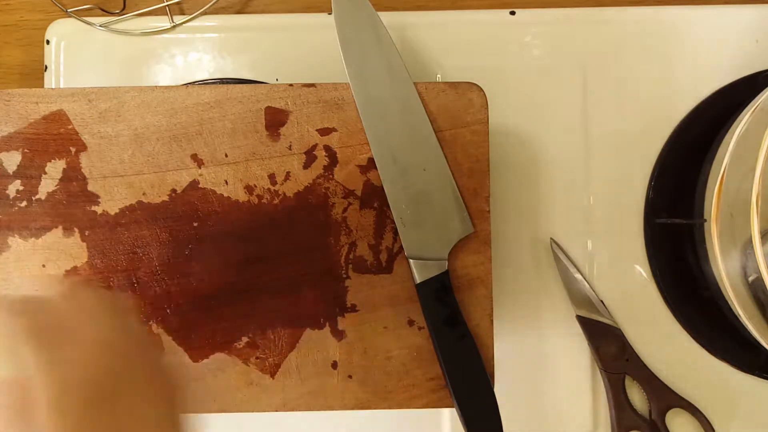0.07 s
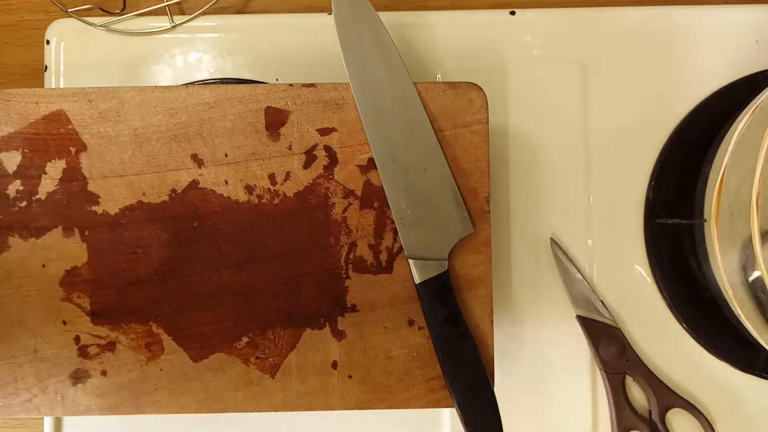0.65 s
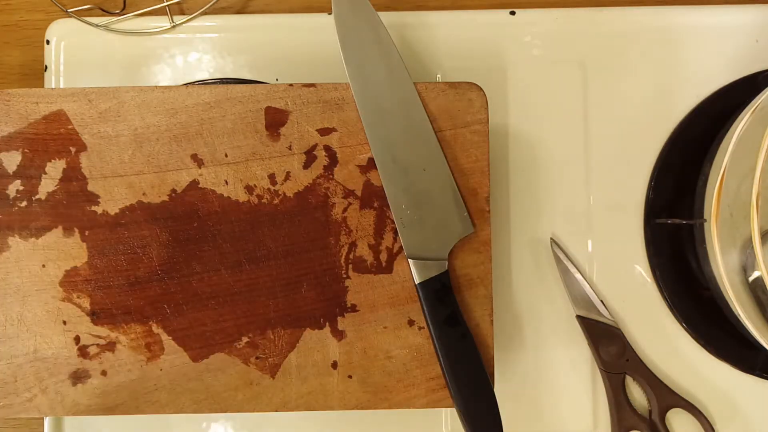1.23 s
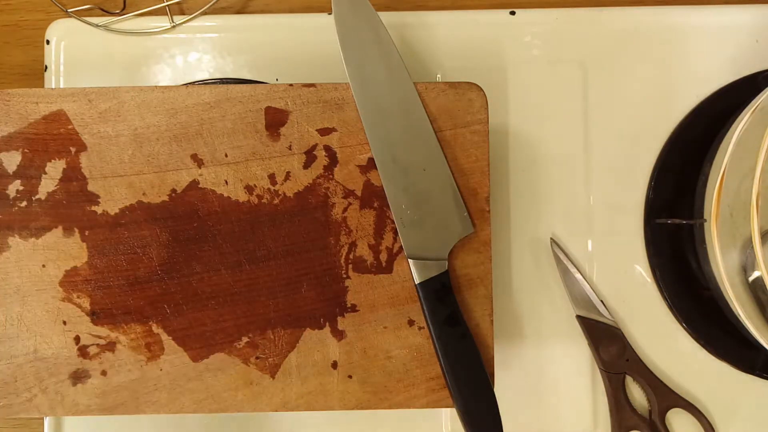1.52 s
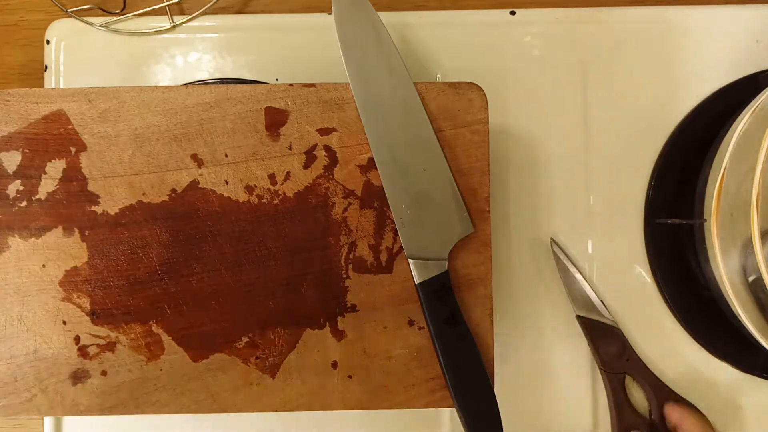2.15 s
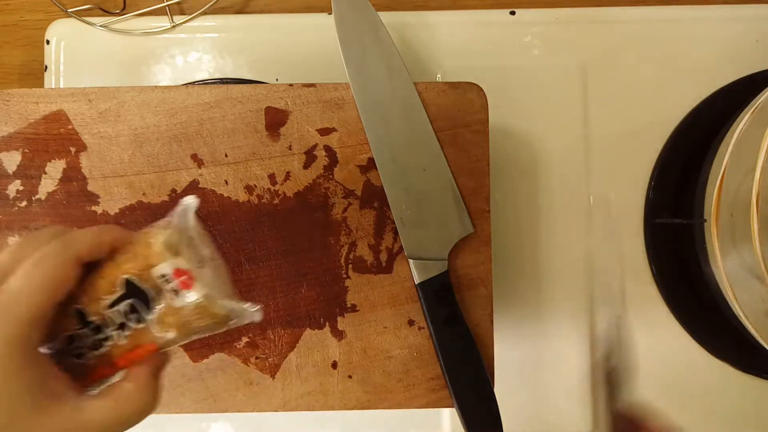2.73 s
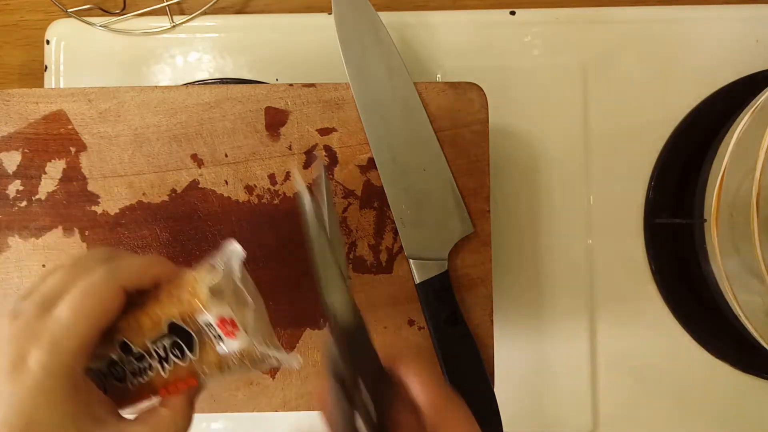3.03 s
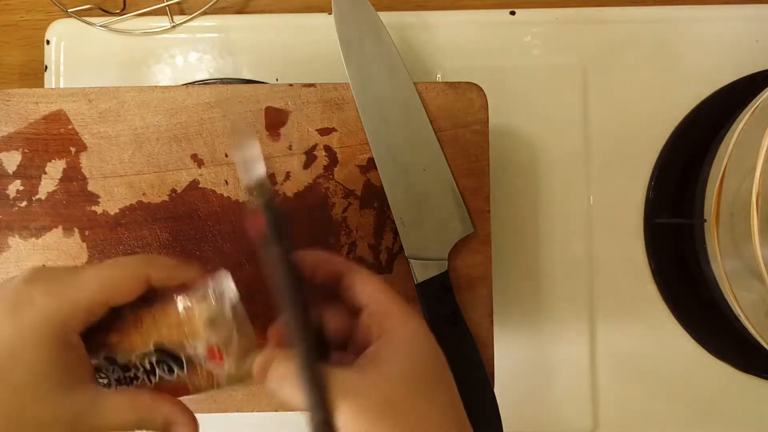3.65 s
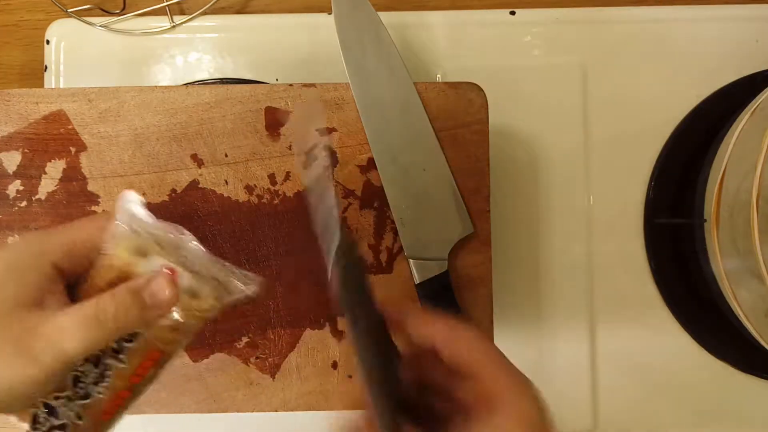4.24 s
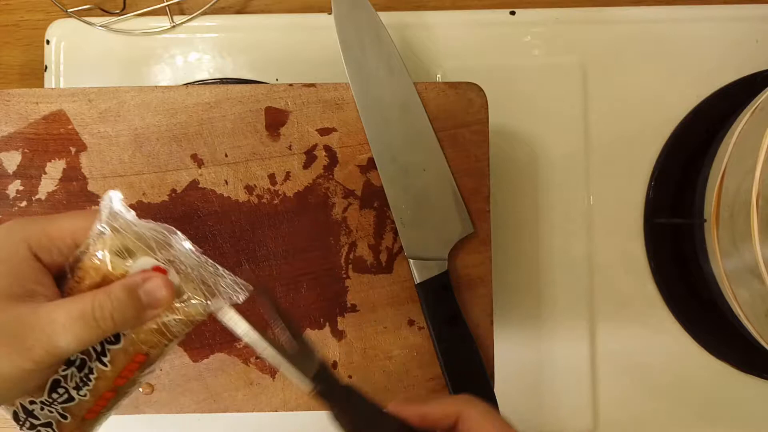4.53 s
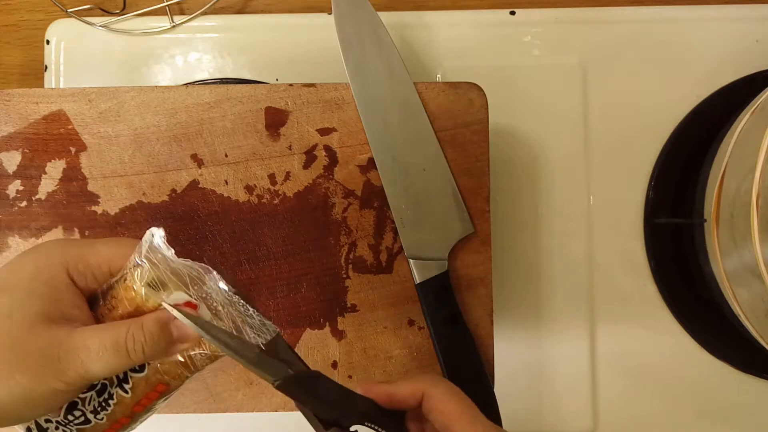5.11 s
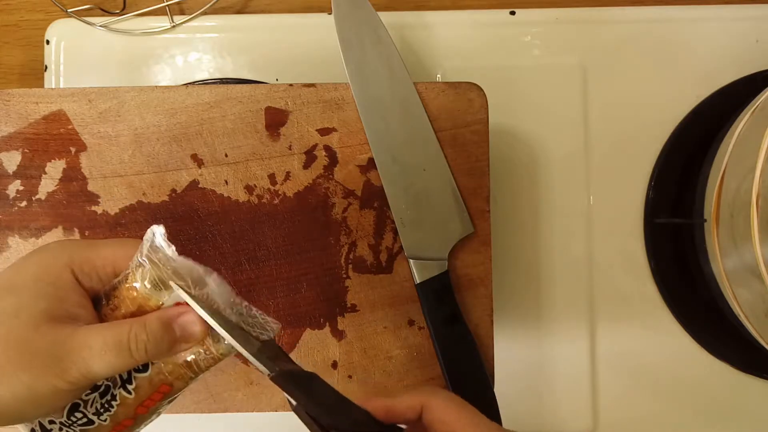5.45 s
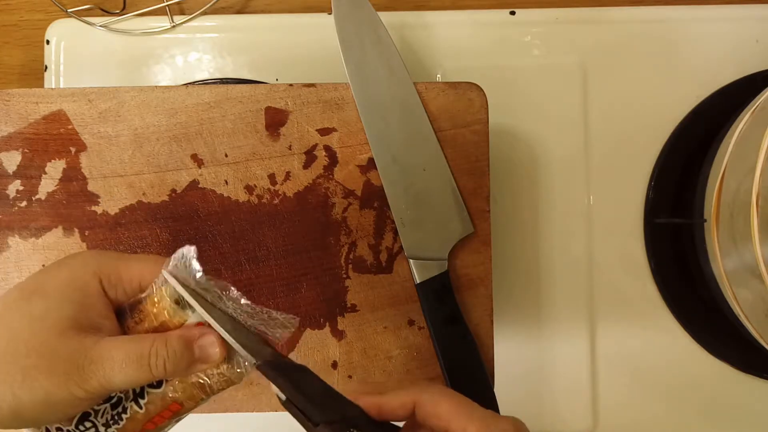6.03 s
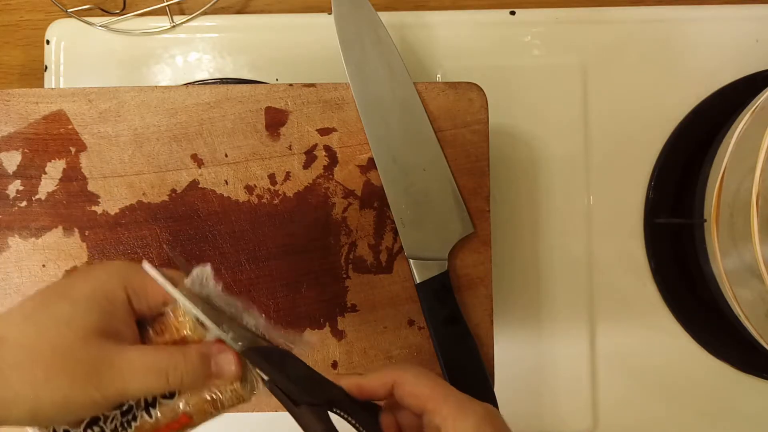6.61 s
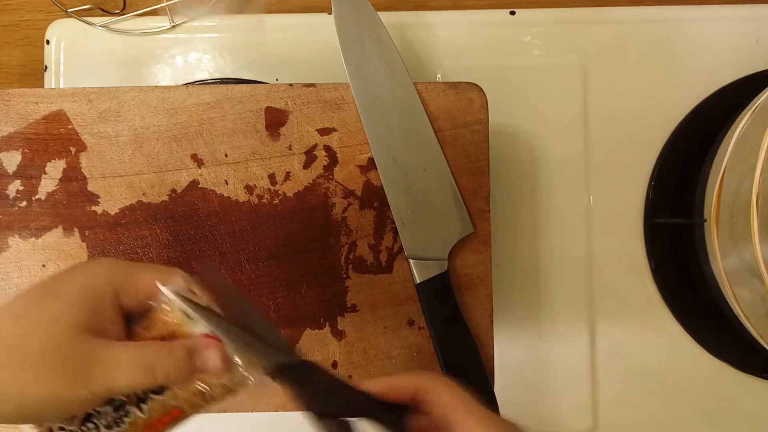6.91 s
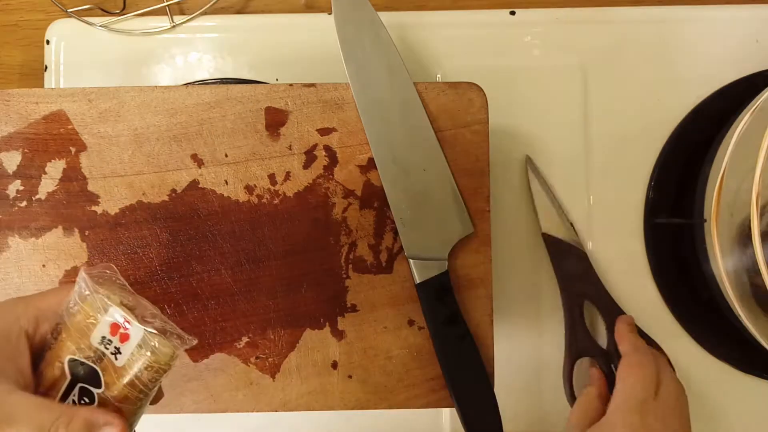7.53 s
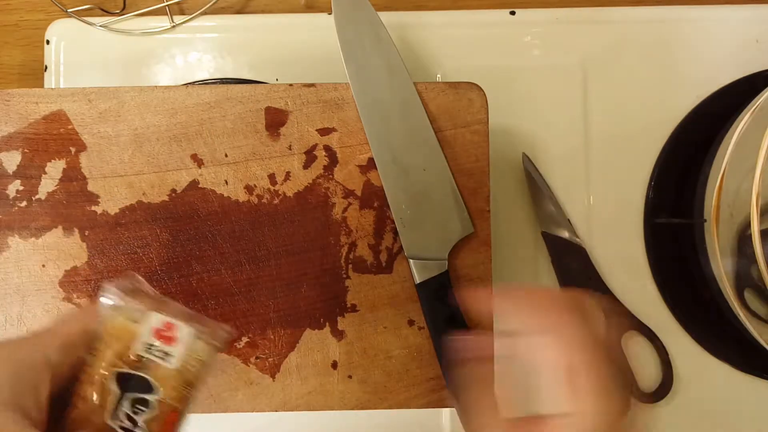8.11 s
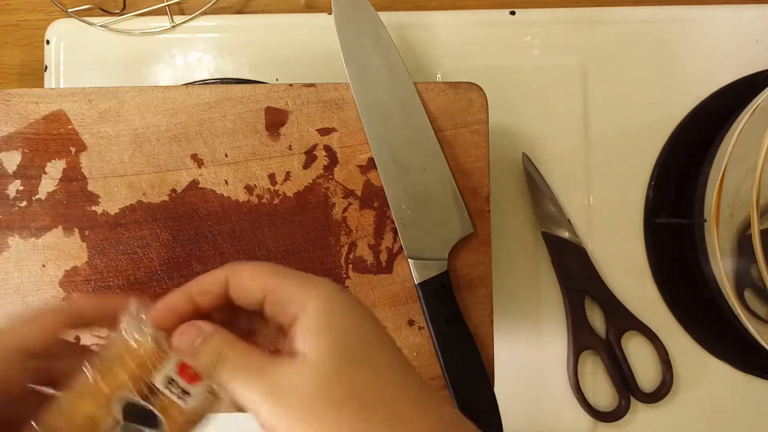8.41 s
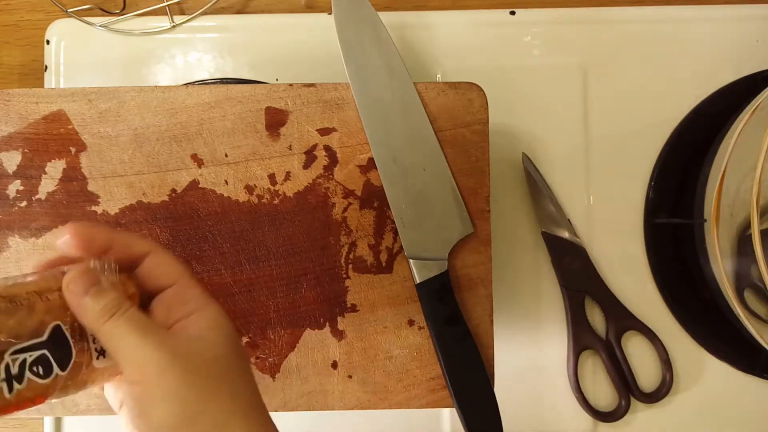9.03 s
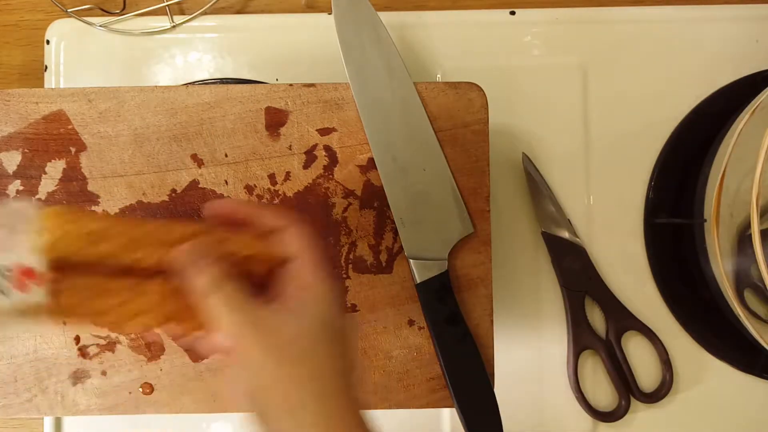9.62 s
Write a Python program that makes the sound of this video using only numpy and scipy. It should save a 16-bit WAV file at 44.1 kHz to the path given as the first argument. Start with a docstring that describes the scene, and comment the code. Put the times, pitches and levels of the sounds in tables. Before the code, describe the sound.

In a small kitchen with a faint low hum, stiff plastic packaging is handled close to the microphones. Light swishes and ticks come first, followed by the metallic knock of scissors being picked up. Crisp crinkling builds, with short cuts through the film and one hard crack. The blades snap shut and the scissors clatter onto a stove top. Then the wrapper is pulled open with thick crackling and a dull crunch from its filling.

```python
"""A stiff plastic snack wrapper rustles and crackles, close to a pair of microphones in a small kitchen.
Its creases snap through and its film hisses as it is handled, cut open over a wooden board and peeled
back; the filling crunches dully. Scissors clatter on the hollow stove top when picked up and laid down,
their handles clack and their blades click shut and ring. Behind it all the hard room hums faintly.
At about 3.5 s the sound drops out for an instant."""
import sys
import numpy as np
from scipy import signal
from scipy.fft import rfft, irfft, next_fast_len
from scipy.io import wavfile

SR = 44100
rng = np.random.default_rng(int(sys.argv[2]) if len(sys.argv) > 2 else 0)


def int16_out(signal):
    """Quantize to a 16-bit WAV file."""
    q = np.round(np.clip(np.atleast_2d(signal).T, -1, 1) * 32767)
    wavfile.write(sys.argv[1], SR, q.astype(np.int16))


N = 430416

# spectrum of the crackling film: frequency_hz, level_db
FILM_SPECTRUM = [(200, -13.5), (400, -10.5), (1000, -10.5), (1800, -6.5), (2400, -3), (3400, -0.5),
                 (4600, -3.5), (6500, -4.5), (8000, -13), (11000, -11.5), (15500, -38.5)]
# spectrum of the bright edge of a snap or tear: frequency_hz, level_db
CRISP_SPECTRUM = [(2000, -13), (5000, -36.5), (6800, 3.5), (8200, -2), (12000, -6), (15500, -15)]
# spectrum of the dull crunch of the filled pack: frequency_hz, level_db
FILLING_SPECTRUM = [(150, -23.5), (400, 4), (700, 1), (1300, 5), (2200, -9.5), (4000, -33)]
# spectrum of clattering steel: frequency_hz, level_db
STEEL_SPECTRUM = [(700, -13.5), (1400, -4), (2300, -1.5), (3600, 0), (5000, -6.5), (6700, -2),
                  (8000, -10.5), (12000, -10), (16000, -20)]
# scissors against board and stove top: start_s, thud_db, thud_hz, clatter_db, clatter_hz, chatter_s
KNOCK_EVENTS = [(2.24, -50.5, 380, -62, 1440, 0.013), (2.377, -34.5, 513, -42, 3400, 0.038),
                (2.4947, -29, 370, -39, 4380, 0.053), (7.532, -33, 225, -39.5, 5060, 0.039),
                (7.718, -30, 580, -47, 1330, 0.0097), (7.867, -34.5, 295, -40.5, 4170, 0.011),
                (8.007, -31.5, 590, -35, 4400, 0.05), (8.131, -46, 500, -54, 2580, 0.0037)]
# blades clicking shut: start_s, level_db
SNIP_EVENTS = [(2.3033, -25), (7.2337, -19.5)]


def crease_snaps(facet_db=6.5, crack_db=6, crisp_db=1, slip_t60=0.013, avalanche_t60=0.046):
    """A crease flips in a stutter of slips, its facet rings brightly, and an avalanche of folds follows."""
    # the loudest creases: start_s, level_db, facet_hz, edge_db, avalanche_gain
    loud_creases = [(0.4578, -31.5, 3770, -18, 0.88), (1.495, -37.5, 3320.0, -6, 0.66),
                    (1.6417, -31, 3830, 2, 1.27), (1.9821, -38, 3770, -16, 0.89),
                    (2.1196, -37.5, 4300, -6, 1.1), (2.8456, -24.5, 3950.0, -2.5, 0.56),
                    (2.8912, -22.5, 3500, -17, 0.41), (3.265, -27, 3540.0, -3, 0.64),
                    (3.274, -20, 4040, -1.5, 0.31), (3.3407, -27.5, 3500, -9, 0.72),
                    (3.4126, -29, 3520, -1, 0.67), (3.5389, -26, 3760.0, -1.5, 0.27),
                    (3.5915, -23.5, 3380, -2, 1.3), (3.7227, -18.5, 3560, -2, 0.26),
                    (3.7584, -23.5, 3720.0, 0, 0.44), (3.7794, -23, 3320, -1, 1.7),
                    (3.8585, -17.5, 2460.0, -11.0, 0.49), (3.8645, -22, 3730, 0.5, 0.84),
                    (3.9, -20, 3400, -6, 0.5), (4.0762, -23, 3640.0, -5, 0.24),
                    (4.2156, -27.5, 3570, -3.5, 0.6), (4.2532, -26, 3200.0, -7.5, 0.8),
                    (4.363, -27, 3060, -1, 0.5), (4.8703, -28, 3140, 1, 0.3),
                    (4.9185, -21.5, 3850, -1, 0.43), (4.9314, -23.5, 3400.0, -2, 0.3),
                    (5.003, -23.5, 3630, -6, 0.32), (5.1163, -27, 4200, -15, 0.27),
                    (5.2932, -23, 4930.0, -3, 0.28), (5.3555, -22.5, 2860.0, -7.0, 0.48),
                    (5.3872, -25.5, 4340.0, -2, 0.51), (5.468, -25.5, 4330.0, 4, 0.36),
                    (5.5714, -17.5, 3470, -5, 0.24), (5.6365, -21.0, 2850, 2.5, 0.49),
                    (5.9108, -23.5, 3800.0, -3, 0.5), (5.9413, -18, 2900, -5.5, 0.24),
                    (6.0038, -21, 4000, -6, 0.26), (6.2354, -28.5, 4620.0, -1, 0.6),
                    (6.2652, -21.0, 3000, 0, 0.43), (6.2945, -23, 2770.0, -17, 0.34),
                    (6.7496, -25.5, 4070.0, 6, 0.37), (6.7982, -23.5, 4220, -2, 0.31),
                    (6.994, -25.5, 2670.0, -6, 0.48), (7.004, -25.5, 3290.0, 3.5, 0.26),
                    (7.0537, -24, 3240, -0.5, 0.6), (7.419, -33.5, 2610, -11, 0.4),
                    (8.32, -19.5, 2360, -6, 0.42), (8.356, -19, 2500, -3.5, 1.34),
                    (8.4094, -25, 3970.0, -1.0, 0.37), (8.5138, -20.5, 3100, -8.5, 0.66),
                    (8.7585, -26, 3040, -14, 0.6), (8.8927, -17, 4340, 1.5, 0.43),
                    (8.9654, -23.5, 3590.0, -8, 0.32), (8.975, -25.5, 3210.0, 3, 0.27),
                    (9.0857, -18.5, 4380, -3, 0.78), (9.1535, -20, 2980, 2.5, 0.56),
                    (9.1863, -18.5, 3040.0, -11, 0.4), (9.2024, -16.5, 3720, -3, 0.54),
                    (9.241, -15.5, 4340, -0.5, 0.2), (9.3878, -20, 3620, 1, 0.4),
                    (9.3934, -19, 3200, -9, 0.8), (9.4908, -21.5, 3730.0, -1.5, 0.26),
                    (9.5372, -23.5, 2520, -10, 0.2), (9.6002, -22, 3490.0, -5, 0.55)]
    body, edge, t = np.zeros(N), np.zeros(N), np.arange(SR // 8) / SR
    impulse = t == 0
    for start, db, hz, edge_db, avalanche in list(loud_creases) + lesser_creases():
        flip = impulse + 0.18 * rng.standard_normal(len(t)) * fade(t, slip_t60)
        folds = clicks(900, 2.5, len(t)) * fade(t, avalanche_t60)
        force = from_db(db) * (flip / np.linalg.norm(flip) + avalanche * folds / np.linalg.norm(folds))
        # the facet is heavily damped and radiates little below its own pitch
        facet = resonance(force, hz, width_hz=0.46 * hz)
        crack = signal.sosfilt(signal.butter(2, 0.13 * hz, "high", fs=SR, output="sos"), force + 1e-18)
        first_slip = 0.18 * from_db(db) * impulse
        add(body, start, from_db(facet_db) * facet + from_db(crack_db) * crack)
        add(edge, start, from_db(crisp_db + edge_db) * (force + first_slip))
    softened = colour(colour(body, FILM_SPECTRUM), [(6500, 0.5), (9000, -5.5)])
    return softened + colour(edge, CRISP_SPECTRUM)


def lesser_creases(per_s=22, lift_db=3.5, spread_db=4, facet_hz=3400, edge_db=-2, avalanche=0.5):
    """Rows for small snaps at random times, as strong as the handling, within an octave of facet_hz."""
    handling, _, _ = hands()
    rows = []
    for when, strength, pitch in rng.random((int(per_s * N / SR), 3)):
        at = int(when * (N - 1))
        db = 20 * np.log10(handling[at] + 1e-9) + lift_db - spread_db * np.log(max(strength, 0.1))
        rows.append((at / SR, db, facet_hz * 2 ** (2 * pitch - 1), edge_db, avalanche))
    return rows


def rustle(film_db=-3, crisp_db=-22, filling_db=-4, shear_db=-4, drag_db=-3):
    """Tiny folds in bunches, denser as the hands work harder, with hiss, crunch, shearing and swish."""
    handling, squeeze, drag = hands()
    busy = np.sqrt(handling / handling.mean()) + 0.22
    folds = rms_one(facets(260 * busy) * clumps(per_s=70, spread_db=4) / np.sqrt(busy))
    grains = folds + 0.14 * rng.standard_normal(N)   # sliding film hisses
    crisp = from_db(crisp_db) * rms_one(colour(folds, CRISP_SPECTRUM))
    near = from_db(film_db) * handling * (rms_one(colour(grains, FILM_SPECTRUM)) + crisp)
    crunch = from_db(filling_db) * squeeze * rms_one(colour(clicks(900, 7.9, N), FILLING_SPECTRUM))
    # farther from the microphones the folds blur into a soft, duller swish
    far = colour(facets(1200), FILM_SPECTRUM)
    swish = rms_one(resonance(far, 1500, 12400) + 0.76 * resonance(far, 3550, 230))
    return near + crunch + from_db(shear_db) * shearing() + from_db(drag_db) * drag * swish


def hands(rise_s=0.045, fall_s=0.037, resting_db=-62):
    """Gains in time of the rustle of the gripped film, the crunch of its filling and the drag."""
    # the fingers take a new grip: start_s, hold_s, rustle_db, crunch_db
    grips = [(2.838, 0.024, -57, -47), (3.308, 0.12, -52.5, -55), (3.782, 0.13, -42, -51),
             (4.247, 0.11, -45, -47.5), (5.38, 0.3, -46.5, -75), (5.95, 0.064, -45, -71),
             (6.202, 0.13, -49.5, -57), (6.714, 0.11, -51.5, -78), (6.996, 0.17, -54, -77),
             (8.35, 0.057, -43.5, -52), (8.534, 0.44, -49.5, -53.5), (8.881, 0.44, -38.5, -48),
             (9.424, 1, -41.5, -50)]
    # the pack is dragged out from one side: peak_s, level_db, rise_s, fall_s
    drags = [(0.18, -48, 0.0084, 0.029), (0.29, -52, .04, 0.046), (0.775, -50.5, 0.078, 0.048),
             (0.923, -40.5, 0.056, 0.047), (1.425, -53, .012, 0.026), (1.595, -53, .008, 0.037),
             (1.65, -50, .005, 0.035), (1.735, -49, 0.017, 0.031)]
    # once in the hand, the pack is never quite still
    handling = from_db(resting_db) * swell(2.6, 7.16, rise_s, fall_s)
    squeeze = np.zeros(N)
    for start, hold, rustle_db, crunch_db in grips:
        grip = swell(start, hold, rise_s, fall_s)
        handling += from_db(rustle_db) * grip
        squeeze += from_db(crunch_db) * grip
    drag = sum(from_db(db) * swell(peak, 0, rise, fall) for peak, db, rise, fall in drags)
    return handling, squeeze, drag


def swell(start_s, hold_s, rise_s, fall_s):
    """Gain of one hand movement: it builds exponentially up to start_s, holds and dies away."""
    t = np.arange(N) / SR - start_s
    return np.exp(np.minimum(t, 0) / rise_s - np.maximum(t - hold_s, 0) / fall_s)


def facets(per_s, count=6):
    """Random folds, dealt to facets of different size, each with a short ring of its own."""
    folds = clicks(per_s, 4, N)
    dealt = rng.integers(0, count, N)
    pitches_hz = np.geomspace(2300, 6500, count)
    rings = sum(resonance(folds * (dealt == k), hz, hz / 3) for k, hz in enumerate(pitches_hz))
    return rms_one(0.35 * folds + rings)


def clumps(per_s, spread_db):
    """Folds give way in bunches: a gain that darts through 1000 random levels, then holds."""
    knots = rng.standard_normal(1000)
    return from_db(spread_db * np.interp(np.arange(N) / SR * per_s, np.arange(len(knots)), knots))


def shearing(tears_per_s=2500, rattle_db=-2):
    """Each stroke is a quick run of tiny tears that rattle the film; the filling crunches along."""
    # blades shearing through film, or film peeling: start_s, length_s, crisp_db, crunch_db
    strokes = [(3.76, 0.11, -57, -46), (5.35, 0.35, -58.5, -74), (5.544, 0.14, -49.5, -56),
               (5.759, 0.1, -47.5, -49), (5.952, 0.1, -45.5, -45.5), (6.15, 0.26, -49, -64),
               (6.562, 0.1, -48, -58.5), (6.709, 0.12, -43, -83), (7.147, 0.092, -46, -76),
               (8.86, 0.13, -47, -50), (9.127, 0.23, -42.5, -64), (9.403, 0.083, -43, -52.5)]
    crisp_gain, crunch_gain = np.zeros(N), np.zeros(N)
    for start, length, crisp_db, crunch_db in strokes:
        stroke = signal.windows.tukey(round(length * SR), 0.5)
        add(crisp_gain, start, from_db(crisp_db) * stroke)
        add(crunch_gain, start, from_db(crunch_db) * stroke)
    tears = clicks(tears_per_s, 6.5, N) * clumps(per_s=120, spread_db=6)
    crisp = rms_one(colour(tears, CRISP_SPECTRUM))
    rattle = rms_one(colour(clicks(tears_per_s, 6.5, N), FILM_SPECTRUM))
    crunch = rms_one(colour(clicks(tears_per_s, 1.2, N), FILLING_SPECTRUM))
    return crisp_gain * (crisp + from_db(rattle_db) * rattle) + crunch_gain * crunch


def seam_crack(start_s=5.9415, level_db=-8.5, pitch_hz=2200, slip_t60=0.0027):
    """The blades break through the stiff seam: one hard, dry crack with no folds after it."""
    out, t = np.zeros(N), np.arange(SR // 20) / SR
    force = (t == 0) + 0.3 * rng.standard_normal(len(t)) * fade(t, slip_t60)
    crack = colour(resonance(force, pitch_hz, width_hz=1100), FILM_SPECTRUM)
    add(out, start_s, from_db(level_db) * crack / np.abs(crack).max())
    return out


def scissor_knocks(thud_trim_db=-20, clatter_trim_db=-10, thud_t60=0.11, clatter_t60=0.21):
    """The scissors land and chatter; the hollow stove top booms under them."""
    # modes of the stove top: pitch_hz, level_db, t60_s
    stove_modes = [(163.3, 1, 0.37), (236.5, 1, 0.58), (347.2, 5.5, 0.15), (396, -2.5, 0.48),
                   (436, -13, 0.63), (527, -11.5, 0.29), (690, -8.5, 0.24), (819, -1.5, 0.14),
                   (954, -9, 0.23)]
    # spectrum of the thud: frequency_hz, level_db
    thud_spectrum = [(100, -9.5), (200, -1), (330, -1.5), (700, 4.5), (1000, -2.5), (1500, -5.5),
                     (2500, -52), (5000, -67)]
    out, t = np.zeros(N), np.arange(SR // 2) / SR
    impact = 7 * np.exp(-t * SR / 2)
    for start, thud_db, thud_hz, clatter_db, clatter_hz, chatter_s in KNOCK_EVENTS:
        settling = np.maximum(t - chatter_s, 0)
        contacts = impact + clicks(5000, 2.5, len(t)) * (1 + 3.6 * fade(t, t60=0.037))
        boom = colour(contacts * fade(settling, thud_t60), thud_spectrum)
        boom = rms_one(resonance(boom, thud_hz, width_hz=330) + 0.5 * boom)
        # where the blow lands decides which modes ring most: those near its thud pitch
        panel = rms_one(resonance(struck(stove_modes, t), thud_hz, width_hz=0.75 * thud_hz))
        clatter = colour(contacts * fade(settling, clatter_t60), STEEL_SPECTRUM)
        clatter = rms_one(resonance(clatter, clatter_hz, width_hz=3000) + 0.57 * clatter)
        add(out, start, from_db(thud_db + thud_trim_db) * (boom + panel))
        add(out, start, from_db(clatter_db + clatter_trim_db) * clatter)
    return out


def blade_snips(trim_db=4.5, crack_db=3, crack_t60=0.008, buzz_db=-16, buzz_t60=0.35):
    """Steel meets steel: a short crack, then a buzz of the loose blades."""
    out, t = np.zeros(N), np.arange(SR // 2) / SR
    envelope = from_db(crack_db) * fade(t, crack_t60) + from_db(buzz_db) * fade(t, buzz_t60)
    for start, db in SNIP_EVENTS:
        force = 3 * (t == 0) + rng.standard_normal(len(t)) * envelope
        snip = resonance(colour(force, STEEL_SPECTRUM), hz=5600, width_hz=2600)
        add(out, start, from_db(db + trim_db) * snip)
    return out


def blade_ring(after_knock_db=-10, after_snip_db=-26):
    """The steel blades ring on after each knock and snip."""
    # modes of the blades: pitch_hz, level_db, t60_s
    blade_modes = [(2422, 2, 0.5), (2654, 1.5, 0.22), (3175, -5, 0.32), (3511, -0.5, 0.28), (4834, 0.5, .3),
                   (4815, -11, .4), (5190, -8, 0.14), (5416, -24, 0.22), (5700, -13, 0.15),
                   (6148, -2, 0.19), (6560, -5, 0.35)]
    out, t = np.zeros(N), np.arange(SR // 2) / SR
    for start, _, _, clatter_db, *_ in KNOCK_EVENTS:
        add(out, start, from_db(clatter_db + after_knock_db) * struck(blade_modes, t))
    for start, db in SNIP_EVENTS:
        high_ring = resonance(struck(blade_modes, t), hz=6000, width_hz=1500)
        add(out, start, from_db(db + after_snip_db) * high_ring)
    return out


def handle_clacks(rattle_db=3, rattle_t60=0.092):
    """As the scissors are spread, the pivot rattles briefly and the handles ring."""
    # the clacks: start_s, level_db
    clack_events = [(4.501, -44), (4.54, -35)]
    # modes of handles and pivot: pitch_hz, level_db, t60_s
    handle_modes = [(361, -1.5, 0.15), (587, -10.5, .2), (753, -1, 0.092), (1066, -6, .16), (1330, 0, 0.13),
                    (1600, -8, 0.14), (1954, -19, .15), (2480, -6.5, 0.19), (3004, -4, 0.098),
                    (3620, -3, 0.11), (4888, -13.5, 0.21)]
    # spectrum of the rattle: frequency_hz, level_db
    pivot_spectrum = [(200, -10), (1200, 1.5), (3600, 7), (4500, -1), (9000, -27)]
    out, t = np.zeros(N), np.arange(SR // 2) / SR
    for start, db in clack_events:
        rattle = colour(rng.standard_normal(len(t)) * fade(t, rattle_t60), pivot_spectrum)
        add(out, start, from_db(db) * (0.61 * struck(handle_modes, t) + from_db(rattle_db) * rattle))
    return out


def tink(start_s=0.9, level_db=-43, pitch_hz=3530, t60=0.13):
    """Something hard is brushed and rings with one faint tone."""
    out, t = np.zeros(N), np.arange(SR // 2) / SR
    add(out, start_s, from_db(level_db) * np.sin(2 * np.pi * pitch_hz * t) * fade(t, t60))
    return out


def kitchen_echoes(build_s=0.00027):
    """Stereo response of the small hard room: dense echoes that die band by band."""
    # decay of the room: frequency_hz, t60_s
    decay_times = [(150, 0.51), (500, 0.21), (1500, 0.27), (3500, 0.2), (7000, 0.27), (15000, 0.21)]
    # likeness of the echoes at the two microphones: frequency_hz, correlation
    echo_likeness = [(100, 0.54), (300, 0.91), (650, 0.74), (1400, 0.036), (3000, 0.0054), (12000, 0.13)]
    # soft things swallow the top of the echoes: frequency_hz, gain_db
    absorption = [(5000, 4), (8000, 3.5), (14000, -1.5)]
    t = np.arange(SR // 2) / SR
    hz = np.fft.rfftfreq(len(t), 1 / SR)
    noise = stereo_noise(echo_likeness, len(t))
    edges_hz = np.r_[0, np.geomspace(150, SR / 2, 12)]
    tail = np.zeros((2, len(t)))
    for low, high in zip(edges_hz, edges_hz[1:]):
        band = irfft(noise * (hz >= low) * (hz < high), len(t))
        tail += band * fade(t, at_hz(decay_times, (low + high) / 2))
    tail *= 1 - np.exp(-t / build_s)
    return np.array([colour(side / np.linalg.norm(side), absorption) for side in tail])


def room_tone(level_db=-51.5):
    """Steady low rumble and faint hiss of the kitchen."""
    # spectrum of the quiet room: frequency_hz, level_db
    hum_spectrum = [(15, -37), (25, -18), (108, 5.5), (153, -1), (242, -17), (641, -11), (863, -14.5),
                    (1740, -16.5), (3520, -10.5), (6380, -21), (8140, -37), (14400, -40), (16000, -41)]
    # likeness of the hum at the two microphones: frequency_hz, correlation
    hum_likeness = [(60, 1), (130, 0.93), (300, 0.62), (700, 0.39), (1400, 0.025), (8000, 0.017)]
    size = 2 * next_fast_len(N // 2 + 1)
    gains = from_db(at_hz(hum_spectrum, np.fft.rfftfreq(size, 1 / SR)))
    hum = irfft(stereo_noise(hum_likeness, size) * gains)[:, :N]
    return from_db(level_db) * rms_one(hum)


def at_microphones(x, room, lead_ms, direct_db, room_db):
    """The direct sound reaches the left microphone first; the room answers on both."""
    late = np.roll(x, round(lead_ms * SR / 1000))
    echoes = np.array([convolve(x, side) for side in room])
    return from_db(direct_db) * np.array([x, late]) + from_db(room_db) * echoes


def clicks(per_s, spread_db, size):
    """Random clicks of either sign: many small, a few large."""
    heights = from_db(spread_db * np.minimum(rng.exponential(1, size), 4))
    return (rng.random(size) < per_s / SR) * heights * rng.choice([-1, 1], size)


def struck(modes, t):
    """Ring of a body; each blow shares its force a little differently among the modes."""
    return sum(from_db(db + rng.normal()) * rng.choice([-1, 1])
               * np.sin(2 * np.pi * hz * t) * fade(t, t60) for hz, db, t60 in modes)


def stereo_noise(likeness, size):
    """Spectra of two white noises that are as alike as the table says."""
    mid, side = rfft(rng.standard_normal((2, size)))
    alike = at_hz(likeness, np.fft.rfftfreq(size, 1 / SR))
    return (np.sqrt(1 + alike) * mid + np.sqrt(1 - alike) * side * [[1], [-1]]) / np.sqrt(2)


def resonance(x, hz, width_hz):
    """Two-pole resonance with gain 1 at its peak."""
    r = np.exp(-np.pi * width_hz / SR)
    feedback = [1, -2 * r * np.cos(2 * np.pi * hz / SR), r * r]
    return signal.lfilter(np.array([1, 0, -1]) * (1 - r * r) / 2, feedback, x + 1e-18)


def colour(x, spectrum, size=2048):
    """Minimum-phase filter with the given spectrum: nothing sounds before its cause."""
    cepstrum = irfft(np.log(from_db(at_hz(spectrum, np.fft.rfftfreq(size, 1 / SR)))))
    cepstrum[1:size // 2] *= 2
    cepstrum[size // 2 + 1:] = 0
    return convolve(x, irfft(np.exp(rfft(cepstrum))))


def convolve(x, response):
    """Causal convolution that keeps the length of x."""
    return signal.oaconvolve(x, response)[:len(x)]


def at_hz(points, hz):
    """Read a table on a log-frequency axis."""
    frequencies, values = np.transpose(points)
    return np.interp(np.log(np.maximum(hz, 1)), np.log(frequencies), values)


def fade(t, t60):
    """Gain of a ring that loses 60 dB in t60 seconds."""
    return np.exp(-np.log(1000) * t / t60)


def from_db(db):
    """Decibels to gain."""
    return 10 ** (np.asarray(db) / 20)


def rms_one(x):
    """Scale to unit rms."""
    return x / np.sqrt(np.mean(x ** 2) + 1e-20)


def add(track, start_s, sound):
    """Mix a sound in at start_s."""
    start = round(start_s * SR)
    track[start:start + len(sound)] += sound[:N - start]


def scene():
    """Wrapper and scissors sound in one room, heard by two microphones of different colour."""
    # where the pack is between the microphones: time_s, left_minus_right_db
    pack_position = [(2.2, -3.5), (2.8, 1.5)]
    # how the two microphones differ: frequency_hz, left_minus_right_db
    microphone_balance = [(200, -0.3), (1300, -1), (2400, -6), (4400, -9), (8000, -3), (15000, 2)]
    room = kitchen_echoes()
    wrapper = at_microphones(crease_snaps(), room, lead_ms=0.33, direct_db=14, room_db=11)
    wrapper += at_microphones(rustle(), room, lead_ms=0.39, direct_db=3, room_db=-0.5)
    wrapper += at_microphones(seam_crack(), room, lead_ms=0.33, direct_db=3, room_db=-25)
    pan_db = np.interp(np.arange(N) / SR, *np.transpose(pack_position))
    wrapper *= from_db(pan_db * [[0.5], [-0.5]])
    scissors = scissor_knocks() + blade_ring() + blade_snips() + handle_clacks()
    hard_sounds = at_microphones(scissors + tink(), room, lead_ms=0.192, direct_db=4, room_db=4.5)
    left, right = wrapper + hard_sounds + room_tone()
    return np.array([colour(left, [(hz, db / 2) for hz, db in microphone_balance]),
                     colour(right, [(hz, -db / 2) for hz, db in microphone_balance])])


def record(dry):
    """The sound drops out for 35 ms, and the highest treble is cut off steeply."""
    gap_start_s, gap_end_s, cutoff_hz = 3.546, 3.581, 16000
    t = np.arange(N) / SR
    live = (t < gap_start_s) | (t > gap_end_s)
    return signal.sosfilt(signal.ellip(10, 0.2, 80, cutoff_hz, fs=SR, output="sos"), dry * live)


dry = scene()
out = record(dry)
int16_out(out)
```